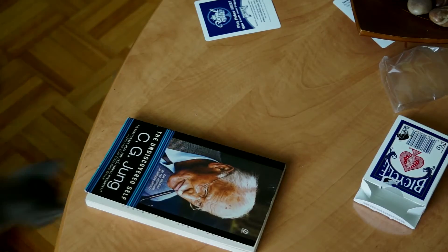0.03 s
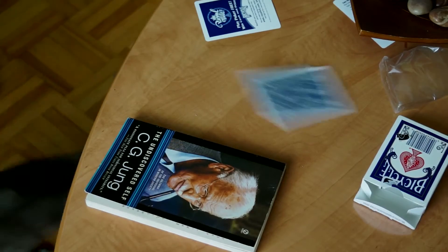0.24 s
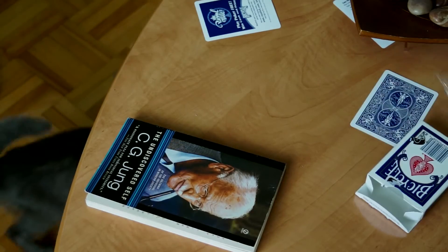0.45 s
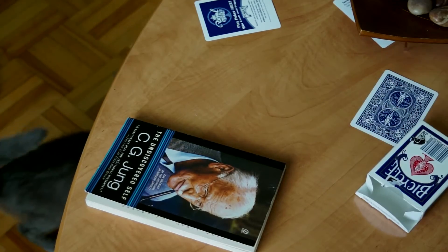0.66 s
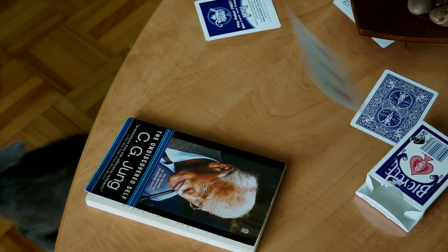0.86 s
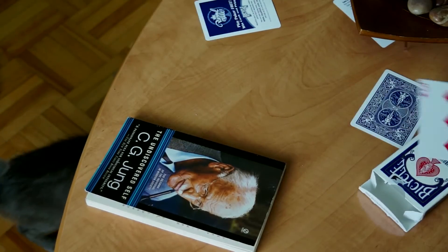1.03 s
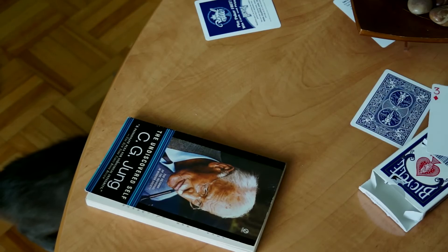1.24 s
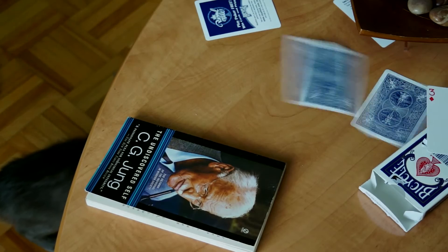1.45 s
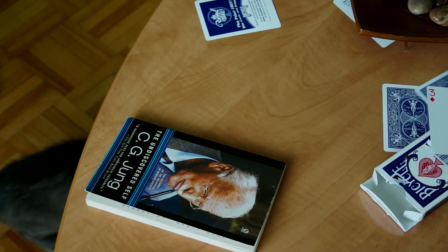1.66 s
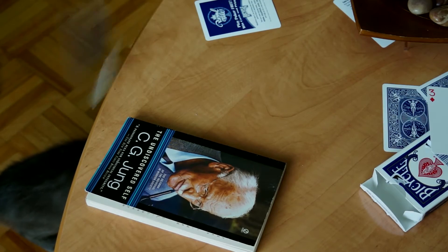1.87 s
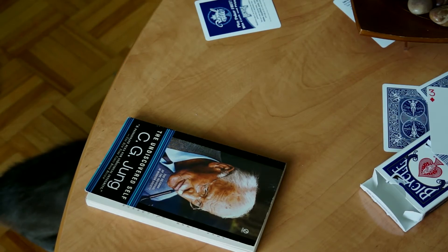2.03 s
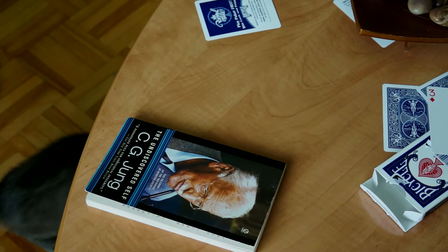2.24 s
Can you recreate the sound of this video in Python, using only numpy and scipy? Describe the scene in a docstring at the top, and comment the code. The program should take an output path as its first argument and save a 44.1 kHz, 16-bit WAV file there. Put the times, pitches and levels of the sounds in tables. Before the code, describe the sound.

Playing cards tossed onto a wooden table, tapping and sliding, one slapping a card box.

```python
"""A small, fairly live room, with a stereo microphone on playing cards tossed onto a wooden table.
The cards slide, tap down and clip things with their edges; one pushes out a low puff of air and
one slaps a card box. Each contact is a burst of tiny impacts that drives resonances and echoes
round the room. Underneath lie quiet room noise, a deep rumble and a faint hum that rises like
an engine in the distance."""
import sys
import numpy as np
from scipy import signal
from scipy.fft import rfft, irfft
from scipy.io import wavfile
from scipy.ndimage import uniform_filter1d

SR = 44100
rng = np.random.default_rng(int(sys.argv[2]) if len(sys.argv) > 2 else 0)


def digitize_waveform(pressure):
    """Quantize a signal to 16-bit integers and store it at the path in sys.argv[1].

    Rows of a 2-D input are taken as channels; values are limited to [-1, 1].
    """
    field = np.atleast_2d(pressure).T
    bounded = np.clip(field, -1, 1)
    quanta = np.round(bounded * 32767).astype(np.int16)
    wavfile.write(sys.argv[1], SR, quanta)


N = 105840


def amp(db):
    """Decibels to gain."""
    return 10 ** (np.asarray(db) / 20)


def unit(x):
    """Scales to rms 1."""
    return x / np.sqrt(np.mean(x ** 2) + 1e-20)


def curve(points, hz):
    """Reads a table on a log-frequency axis."""
    f, value = np.transpose(points)
    return np.interp(np.log(hz + 1), np.log(f + 1), value)


def add(mix, start, sound):
    """Mixes a sound in, start seconds from the beginning."""
    part = mix[:, round(start * SR):][:, :sound.shape[1]]
    part += sound[:, :part.shape[1]]


def spread(mid, side, width):
    """Left and right from a shared and an unshared part."""
    return np.array([mid + width * side, mid - width * side]) / np.sqrt(1 + width ** 2)


def causal(db):
    """The minimum-phase response with these gains, from 0 Hz to half the sample rate."""
    cepstrum = irfft(np.log(amp(db)))
    half = len(cepstrum) // 2
    cepstrum[1:half] *= 2
    cepstrum[half + 1:] = 0
    return np.exp(rfft(cepstrum))


def colour(x, points, size=2048):
    """Filters by a table of (frequency [Hz], gain [dB])."""
    impulse = irfft(causal(curve(points, np.fft.rfftfreq(size, 1 / SR))))
    return signal.fftconvolve(x, impulse[None, :size // 2], axes=1)


# The room's own noise: (frequency [Hz], relative density [dB])
ROOM_TONE_SPECTRUM = [(12, -35), (20, 6.5), (74, -8.5), (215, 4.5), (377, -5.5), (697, -9), (1120, -10),
                      (1320, -13), (2590, -21.5), (2980, -24), (6700, -27), (10200, -31), (16000, -31)]
# Its width at the microphone: (frequency [Hz], side over mid [ratio])
ROOM_TONE_WIDTH = [(30, .3), (120, 0.92), (300, 0.82), (1000, 0.78), (10000, 1)]
def room_tone(level_db=-49):
    """Steady noise all round the microphone, nearly mono in the deep bass."""
    hz = np.fft.rfftfreq(N, 1 / SR)
    mid, side = rfft(rng.standard_normal((2, N)))
    spectrum = spread(mid, side, curve(ROOM_TONE_WIDTH, hz)) * amp(curve(ROOM_TONE_SPECTRUM, hz))
    return amp(level_db) * unit(irfft(spectrum, N))


# Hum from far off: (time [s], pitch [Hz], fundamental level [dB], octave level [dB])
ENGINE_HUM = [(0., 44.43, -60.5, -61), (.8, 45.64, -86.5, -69.5), (.98, 51.9, -52, -59),
              (1.2, 57.16, -59, -54), (1.4, 58.8, -70.5, -56.5), (1.68, 64, -57, -51.5),
              (1.9, 67.24, -58.5, -85), (2.15, 69.6, -59, -62), (2.3, 70.76, -74, -50.5),
              (2.4, 68.4, -75, -65)]
# The rumble beneath it: (time [s], level [dB])
RUMBLE = [(0., -69.5), (1.2, -67), (1.4, -53.5), (2.2, -53.5), (2.4, -81)]
def far_engine(rumble_hz=25.5):
    """A distant engine slowly speeds up over a deep tone that swells and fades."""
    t = np.arange(N) / SR
    times, *columns = np.transpose(ENGINE_HUM)
    hz, fundamental_db, octave_db = (np.interp(t, times, column) for column in columns)
    phase = 2 * np.pi * np.cumsum(hz) / SR
    hum = amp(fundamental_db) * np.sin(phase) + amp(octave_db) * np.sin(2 * phase)
    rumble = amp(np.interp(t, *np.transpose(RUMBLE))) * np.sin(2 * np.pi * rumble_hz * t)
    return np.sqrt(2) * (hum + rumble)


def crackle(envelope, evenness):
    """Tiny impacts as noise under an envelope; evenness 0 keeps their chance colour, 1 flattens it."""
    spectrum = rfft(rng.standard_normal(len(envelope)) * envelope)
    noise = irfft(spectrum / (abs(spectrum) + 1e-9) ** evenness, len(envelope))
    local_rms = np.sqrt(abs(uniform_filter1d(noise ** 2, size=48)) + 1e-16)
    return noise * envelope / local_rms


# The five bands in which each contact's levels are given: (frequency [Hz])
BANDS_HZ = [250, 800, 1700, 3500, 9000]
# Width of the sound coming straight to the microphone: (frequency [Hz], side over mid [ratio])
DIRECT_WIDTH = [(300, .2), (3000, 0.11), (7000, 0.18), (12000, 0.62)]
def contact(rise, decay, send_db, bands_db, modes, ringing=1, grain_db=0, size=8192):
    """Dense micro-impacts build up, die away and drive resonances. Rows: left, right, room send."""
    t, hz = np.arange(size) / SR, np.fft.rfftfreq(size, 1 / SR)
    envelope = np.minimum(t / rise, 1) * np.exp(-np.maximum(t - rise, 0) / decay)
    grain = unit(uniform_filter1d(rng.standard_normal(size), int(0.0012 * SR)))  # 1.2 ms roughness
    envelope *= unit(amp(grain_db * grain))
    # The room averages over all directions, so chance colours its share less.
    mid, side, off_axis = rfft([crackle(envelope, evenness) for evenness in (0.28, 0.28, 0.65)])
    likeness = 0.44  # between the sound sent into the room and the sound facing the microphone
    scattered = likeness * mid + np.sqrt(1 - likeness ** 2) * off_axis
    body_db = curve(list(zip(BANDS_HZ, bands_db)), hz)
    modes_db = ringing * sum(db / (1 + (2 * (hz - f) / width) ** 2) for f, width, db in modes)
    direct = spread(mid, side, curve(DIRECT_WIDTH, hz)) * causal(body_db + modes_db)
    send = amp(send_db) * scattered * causal(body_db + 0.8 * modes_db)  # rings less in the room
    return irfft(np.vstack([direct, send]))


# A card's resonances: (frequency [Hz], width [Hz], boost at full ringing [dB])
CARD_MODES = [(1910, 220, 13), (2654, 590, 21.5), (3730, 400, 9), (4890, 320, 12), (6010, 330, 13.5),
              (8850, 700, 3.5), (10750, 900, 10.5)]
# Slides across the table: (time [s], rise [s], decay [s], room send [dB], five band levels [dB])
SLIDES = [ (0., 0.00067, 0.016, 5, -38, -32, -31, -25.5, -28.5),
          (0.441, 0.093, 0.033, 8, -46, -50, -53, -55, -49.5),
          (.542, 0.0076, .008, -1, -45, -46, -42, -41, -42),
          (.538, 0.041, 0.015, -1, -38, -37, -38.5, -36, -31),
          (1.070, 0.019, 0.033, -15, -55.5, -35, -38, -42.5, -48),
          (1.482, .014, 0.021, -3.5, -48, -28.5, -28.5, -38.5, -32),
          (1.564, 0.047, 0.035, -1, -42, -53, -48.5, -41, -32.5),
          (1.680, 0.021, 0.017, 0, -58, -48, -32, -33, -36.5),
          (1.707, 0.021, 0.01, -7.5, -38, -47, -35, -33, -37),
          (2.255, 0.034, 0.018, 3.5, -36.5, -46, -52, -42, -39.5)]
def card_slides():
    """Cards swish over the wood with a rough friction that barely rings them."""
    mix = np.zeros((3, N))
    for start, rise, decay, send_db, *bands_db in SLIDES:
        swish = contact(rise, decay, send_db, bands_db, CARD_MODES, ringing=0.18, grain_db=2, size=10240)
        add(mix, start, swish)
    return mix


# How long the small room rings: (frequency [Hz], time to fall 60 dB [s])
ROOM_T60 = [(150, .6), (500, 0.28), (1400, 0.52), (3700, 0.41), (9000, 0.42), (15000, 0.28)]
# Tone of its echo: (frequency [Hz], gain [dB])
ROOM_COLOUR = [(100, 1.5), (400, 0.5), (1000, -0.5), (2500, -0.5), (6000, -3.5), (10000, -6), (15000, -6.5)]
def room_echo(send, build_s=0.01):
    """Reflections reach the microphone as a diffuse tail that dies at its own speed in each band."""
    hz, t, noise = signal.stft(rng.standard_normal((2, SR)), SR, nperseg=256)
    decay = amp(-60 * t / curve(ROOM_T60, hz)[:, None])
    _, tail = signal.istft(noise * decay, SR, nperseg=256)
    tail *= np.minimum(np.arange(tail.shape[1]) / SR / build_s, 1)
    tail = spread(*tail, width=0.59) / np.linalg.norm(tail[0])
    return signal.fftconvolve(send[None], colour(tail, ROOM_COLOUR), axes=1)[:, :N]


# Landings on the table: (time [s], rise [s], decay [s], room send [dB], five band levels [dB],
# resonance [Hz], boost [dB])
TAPS = [ (0.1775, 0.000075, 0.0055, -1, -27, -25.5, -28.5, -32.5, -27, 2100, 7.9),
        (0.3254, 0.0026, 0.0026, -2.5, -23.5, -18, -19, -49, -43, 834, 8.9),
        (.3745, 0.0015, 0.0012, 35.5, -57, -48.5, -54, -60.5, -54.5, 2550, 3.7),
        (0.4183, 0.00074, 0.0031, 16, -36.5, -34.5, -40, -45, -45.5, 2310, 13),
        (.9475, .001, 0.01, 0, -38, -25.5, -25.5, -24.5, -28, 974, 15.3),
        (0.957, 0.0013, 0.0024, -2, -45, -17, -25, -40.5, -43.5, 1530, 15.4),
        (0.9669, .001, 0.0024, -9, -34.5, -22, -25, -25.5, -28, 1500, 11),
        (0.97, 0.004, 0.0072, -3.5, -24.5, -20.5, -29, -41, -54, 970, 7),
        (1.004, .003, 0.0073, -9, -49, -29, -32, -39, -61, 1540, 5.1),
        (1.0646, 0.00062, 0.0016, 3, -54, -39, -38, -32, -30.5, 2600, 5.3),
        (1.0802, 0.00078, 0.003, -18, -34, -32, -27, -33, -66, 1520, 3),
        (1.1033, .0003, 0.0025, 6, -54, -62, -33, -36.5, -33, 2550, 4.6),
        (1.3917, 0.0004, 0.0085, -7.5, -23, -29, -34.5, -34.5, -33, 3660, 4.2),
        (1.4230, 0.00019, 0.003, -8.5, -29, -20.5, -28, -13.5, -13.5, 5400, 6.2),
        (1.427, 0.0013, 0.0017, -6, -43, -37, -26, -23, -14, 2660, 11.4),
        (1.4763, 0.0024, 0.0033, -6, -26, -27.5, -23.5, -16.5, -16, 4200, 11),
        (1.5405, 0.00041, 0.0046, -13, -58, -50, -46, -44, -31.5, 4140, 3.2),
        (2.1753, 0.0001, 0.0082, 3.5, -19.5, -28.5, -25.5, -19, -26.5, 365, 11),
        (2.3290, 0.0017, 0.0034, -1, -47, -37, -34, -36, -44, 2560, 4),
        (2.3696, 0.00032, 0.0056, 4.5, -26, -45, -35, -28, -25, 4730, 8)]
def card_taps(q=4.8):
    """Cards tap and flop on the wood, each landing with one resonance."""
    mix = np.zeros((3, N))
    for start, rise, decay, send_db, *bands_db, hz, boost_db in TAPS:
        add(mix, start, contact(rise, decay, send_db, bands_db, [(hz, hz / q, boost_db)], size=4096))
    return mix


# Edge clicks: (time [s], rise [s], decay [s], room send [dB], five band levels [dB], ringing [share])
EDGE_HITS = [ (.2012, .003, 0.0013, -2, -17.5, -14.5, -21.5, -11.5, -8.5, 1.),
             (.2222, 0.00014, 0.0023, -4, -11, -7, -8.5, -4, -6, 0.83),
             (.2930, 0.00035, 0.0029, -3, -37, -22, -28, -15, -20.5, 0.62),
             (.3155, .001, 0.0017, 0, -20, -24, -17, -16.5, -15.5, 0.15)]
def edge_clicks():
    """A card's edge strikes something hard and the card rings."""
    mix = np.zeros((3, N))
    for start, rise, decay, send_db, *bands_db, ringing in EDGE_HITS:
        add(mix, start, contact(rise, decay, send_db, bands_db, CARD_MODES, ringing))
    return mix


def air_puff(start_s=0.2225, length_s=0.0074, gain_db=-28.5):
    """A low push of air from under a card reaches the microphone, then a weaker suction."""
    age = np.maximum(np.arange(N) / SR - start_s, 0) / length_s
    return amp(gain_db) * age * (2 - age) * np.exp(-age)


# Resonances the slap rings, the table's below 300 Hz and the card box's above: (frequency [Hz], width [Hz],
# boost at full ringing [dB])
SLAP_MODES = [(154, 32, 14.3), (279.4, 30, 14), (710, 270, 12.3), (1040, 160, 6.5), (1658, 106, 14),
              (2136, 60, 12.5), (2550, 220, 11.6), (3270, 280, 13), (3930, 300, 10), (4450, 150, 11)]
# On the box: (time [s], rise [s], decay [s], room send [dB], five band levels [dB], ringing [share])
BOX_HITS = [(1.9082, .0019, 0.0038, -0.72, -13, -10, -10, -13.5, -9.5, 0.93)]
def box_slap():
    """A card slaps the card box and rings both the box and the table beneath it."""
    mix = np.zeros((3, N))
    for start, rise, decay, send_db, *bands_db, ringing in BOX_HITS:
        add(mix, start, contact(rise, decay, send_db, bands_db, SLAP_MODES, ringing))
    return mix


# The microphone's response to the contacts and their echo: (frequency [Hz], gain [dB])
MIC_RESPONSE = [(20, -4.5), (7000, 0), (11000, -4), (13000, -10), (15500, -19.5)]
def scene():
    """At the microphone: the cards, their echo and the quiet background."""
    cards = edge_clicks() + box_slap() + card_taps() + card_slides()
    direct, send = cards[:2], cards[2]
    picked_up = colour(direct + room_echo(send), MIC_RESPONSE)[:, :N]
    return picked_up + air_puff() + room_tone() + far_engine()


def record(dry):
    """Peaks clip at full scale, then the top treble is cut off."""
    lowpass = signal.firwin(511, 15750, window=("kaiser", 9), fs=SR)
    return signal.oaconvolve(np.clip(dry, -1, 1), lowpass[None], "same")


dry = scene()
out = record(dry)
digitize_waveform(out)
```